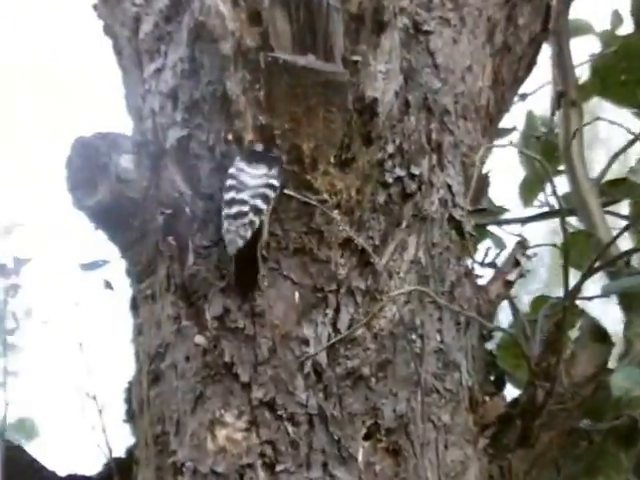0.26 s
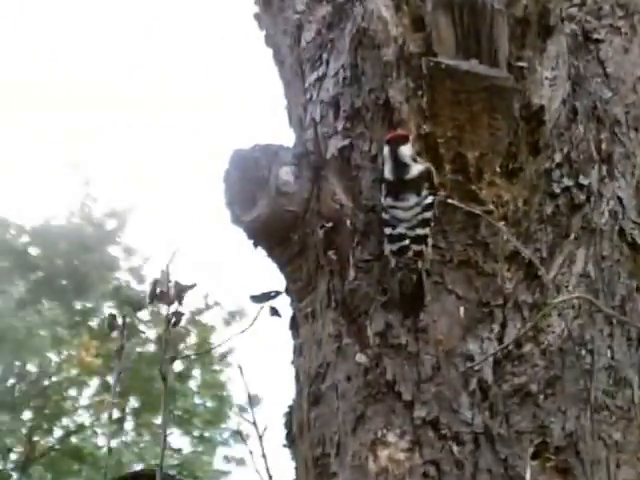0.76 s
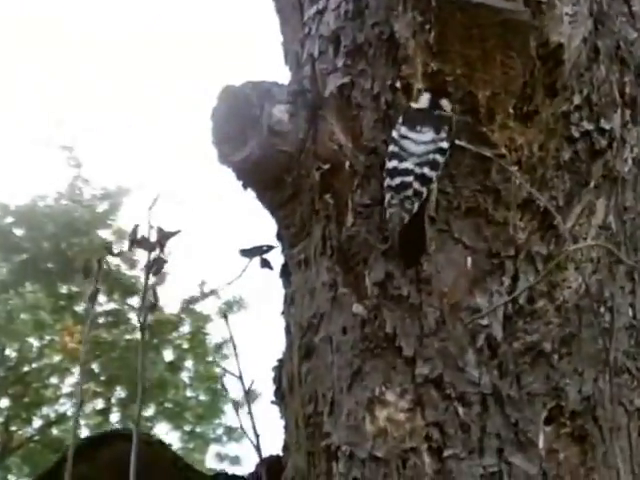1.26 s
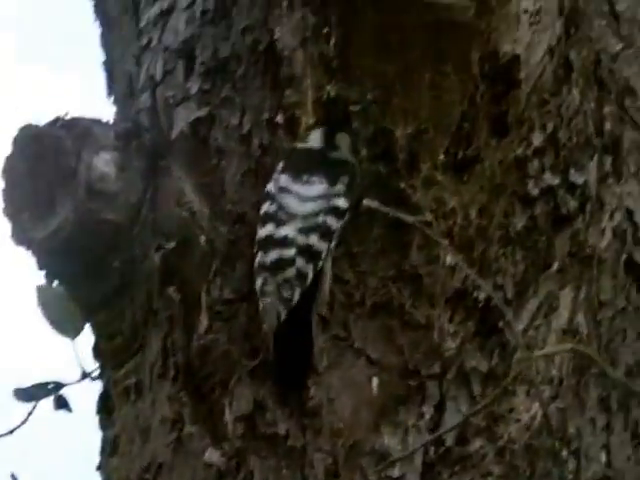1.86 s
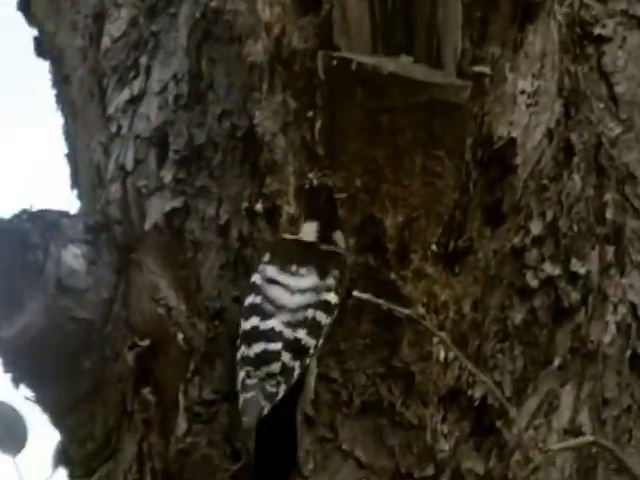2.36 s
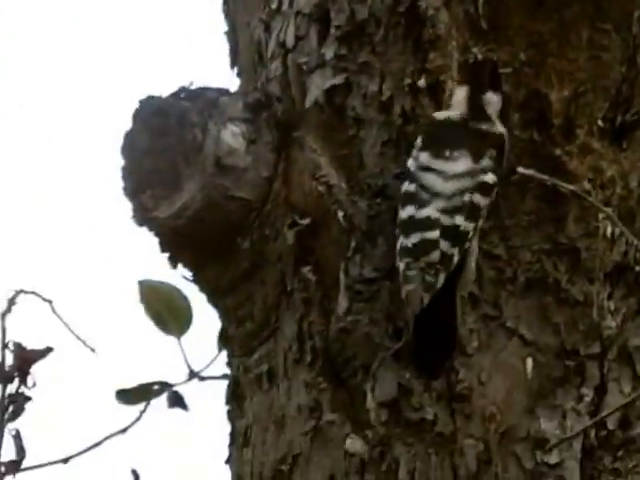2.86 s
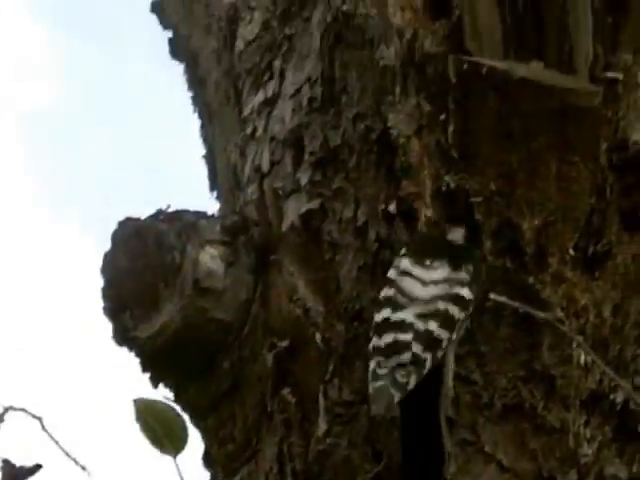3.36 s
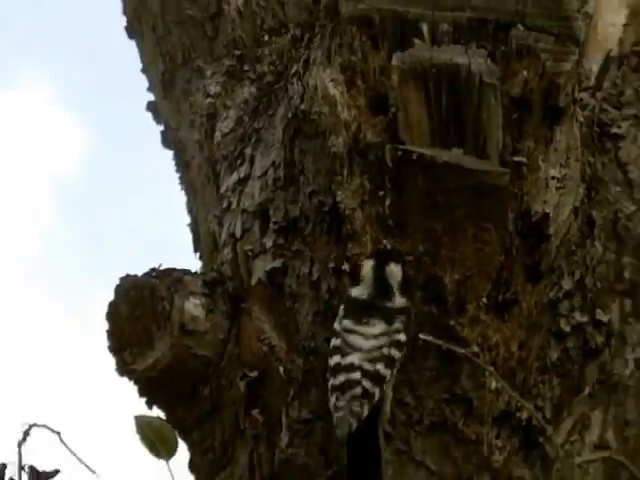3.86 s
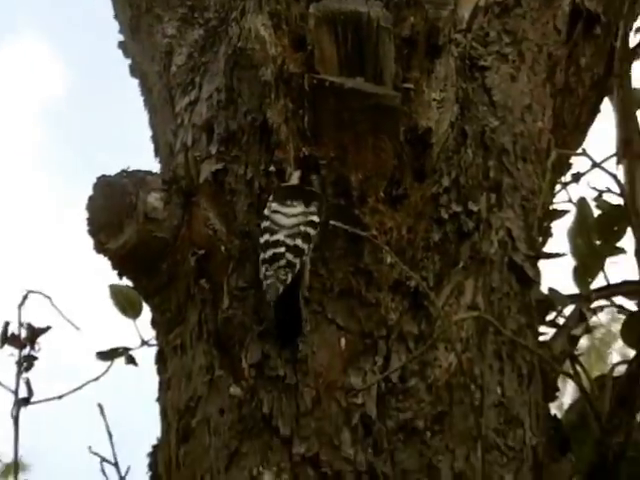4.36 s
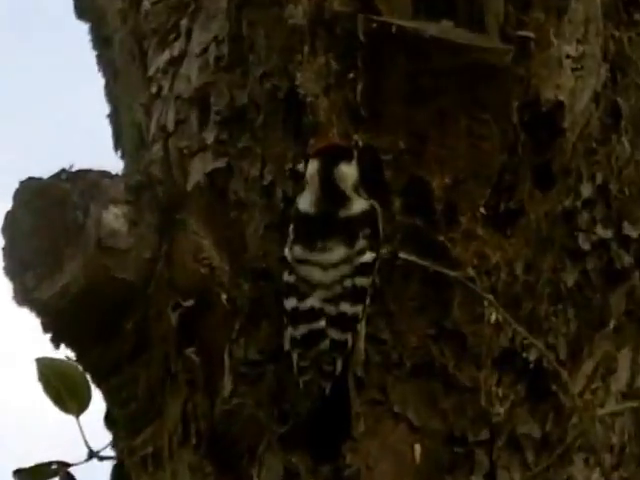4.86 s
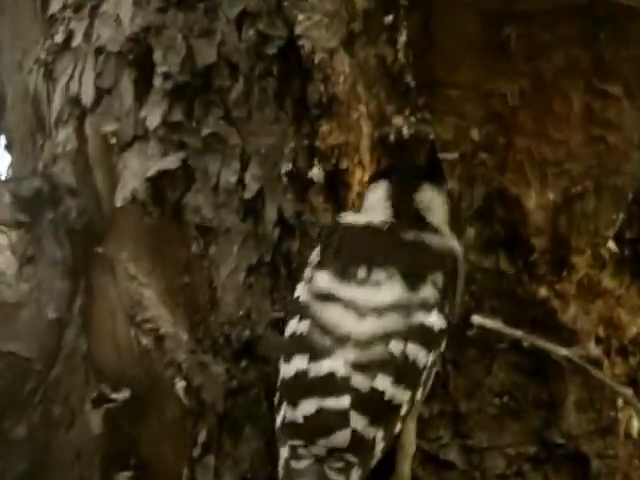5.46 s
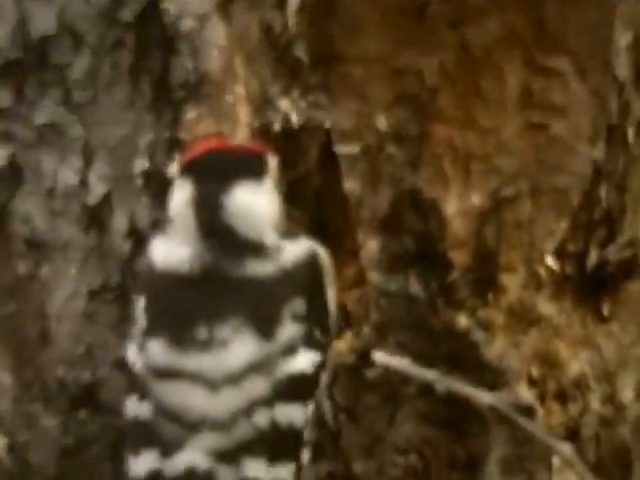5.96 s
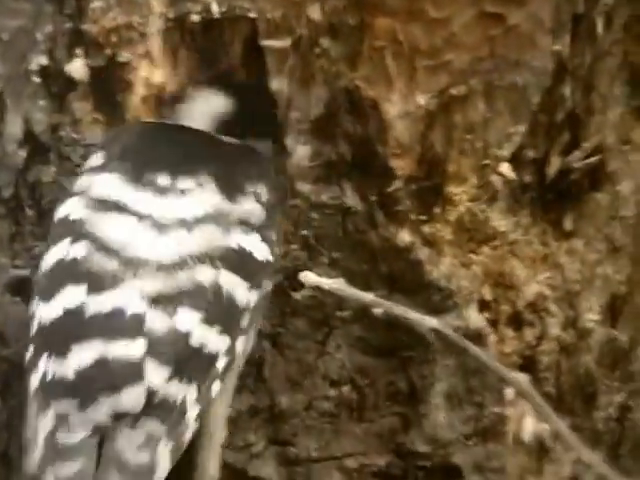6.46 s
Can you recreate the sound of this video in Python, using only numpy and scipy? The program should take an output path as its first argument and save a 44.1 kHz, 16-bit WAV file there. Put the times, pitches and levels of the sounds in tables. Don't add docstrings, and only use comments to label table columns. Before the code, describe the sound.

Quiet low rumble and leaf hiss open, with a tiny bump on the camera. Then a loud, quick woodpecker roll rattles on resonant wood a few metres away and stops sharply. Distant slow knocking and faint high bird whistles fill the pause over road noise. A second roll of dry hollow taps follows, then quiet ambience and one last far knock. Lo-fi pocket microphone, nearly centred, with digital crackle on the left side.

```python
import sys
import numpy as np
from scipy import signal
from scipy.fft import rfft, irfft
from scipy.io import wavfile
from scipy.ndimage import uniform_filter1d

SR = 44100
rng = np.random.default_rng(int(sys.argv[2]) if len(sys.argv) > 2 else 0)


def voltage_ratio(decibels):
    exponent = np.asarray(decibels, float) / 20
    return 10 ** exponent


def generate_wav(signal):
    frames = np.transpose(np.atleast_2d(signal))
    scaled = np.clip(frames, -1, 1) * 32767
    pcm = np.round(scaled).astype(np.int16)
    wavfile.write(sys.argv[1], SR, pcm)


N = 296173

# pitch_hz, level_db, rise_s, t60_s
ECHO_MODES = [(957, 0.5, .001, .033), (803, -0.5, .001, 0.033), (595, -8.5, 0.0017, .03),
              (1170, -7, .0006, 0.033), (1540, -5.5, .0005, 0.019), (1980, -12, .0004, .025),
              (2550, -15, 0.00031, 0.02)]


def coloured(points, count):
    hz, db = np.transpose(points)
    bins = np.fft.rfftfreq(count, 1 / SR)
    gain = voltage_ratio(np.interp(np.log(bins + 1), np.log(hz), db))
    x = irfft(rfft(rng.standard_normal(count)) * gain, count)
    return x / np.std(x)


def walk(rate_hz):
    k = int(SR / rate_hz)
    held = np.repeat(rng.standard_normal(N // k + 1), k)
    return 1.4 * uniform_filter1d(uniform_filter1d(held, k), k)[:N]


def band(x, lo_hz, hi_hz):
    return signal.sosfilt(signal.butter(2, [lo_hz, hi_hz], "band", fs=SR, output="sos"), x)


def add(out, start_s, x):
    i = int(start_s * SR)
    out[i:i + len(x)] += x[:len(out) - i]


def ring(modes, t, detune, scatter_db, slip):
    out = 0
    for pitch_hz, level_db, rise_s, t60_s in modes:
        a, b, c = rng.standard_normal(3)
        shape = (1 - np.exp(-t / rise_s)) ** 2 * np.exp(-np.log(1000) * t / t60_s)
        level = voltage_ratio(level_db + scatter_db * a) / shape.max()
        out = out - level * shape * np.sin(2 * np.pi * pitch_hz * (1 + detune * b) * t + slip * c)
    return out


def puff(lo_hz, hi_hz, t, length_s):
    x = band(rng.standard_normal(len(t)), lo_hz, hi_hz) * np.sin(np.pi * np.minimum(t / length_s, 1))
    return x / np.std(x)


def air():
    # time_s, level_db
    traffic_course = [
        (0, -84),
        (0.598, -74),
        (1.301, -65.5),
        (2.1, -64.5),
        (4, -65.5),
        (4.75, -63),
        (5.051, -66.5),
        (6.72, -63.5),
    ]
    # frequency_hz, density_db (per Hz)
    traffic_spectrum = [(100, -25), (200, -6.5), (350, 2), (500, 1), (800, -2.5), (1120, -7.5),
                        (1300, -14.5), (2000, -19.5), (3000, -35), (5000, -54)]
    leaves_spectrum = [(1000, -0.5), (1500, -6), (2500, -1.5), (4000, -3), (5500, -6.5), (7000, -12.5),
                       (7600, -24), (9000, -47)]
    rumble_spectrum = [(10, -9), (25, -5), (50, -0.5), (100, -4.5), (160, -7.5), (250, -14.5), (450, -15.5),
                       (900, -32.5), (2000, -39.5)]
    traffic_db = np.interp(np.arange(N) / SR, *np.transpose(traffic_course))
    traffic = voltage_ratio(traffic_db + 1.1 * walk(11)) * coloured(traffic_spectrum, N)
    gust_db = 0.7 * walk(3.2)
    leaves_db = -78 + 0.36 * (traffic_db - np.median(traffic_db)) + gust_db
    leaves = voltage_ratio(leaves_db + 0.96 * walk(60)) * coloured(leaves_spectrum, N)
    rumble = voltage_ratio(-66.5 + 0.99 * walk(6.2)) * coloured(rumble_spectrum, N)
    return rumble + traffic + leaves


def nudge():
    centre_s, width_s, height = .277, .003, .0024
    return height * np.exp(-((np.arange(N) / SR - centre_s) / width_s) ** 2)


def strike(t, upper_db, crack_db):
    # pitch_hz, level_db, rise_s, t60_s
    low_modes = [(1029.2, -1.5, .0018, 0.032), (846, -12, 0.0013, 0.06), (1095.5, -7.5, 0.0024, 0.034),
                 (599, -20, 0.0018, 0.024), (424, -22, 0.0058, 0.01)]
    upper_modes = [(1682.4, 4.5, 0.00078, 0.019), (1324, -6.5, 0.0017, 0.017)]
    crack_modes = [(2080, 4, 0.00048, 0.031), (2430, 2, 0.00045, 0.025), (2600, -1.5, 0.00035, 0.019),
                   (3844, -11.5, 0.0011, 0.03), (3384, -16, 0.0018, 0.044)]
    blow = ring(low_modes, t, .008, .9, .4) + voltage_ratio(upper_db) * ring(upper_modes, t, .012, .9, .4)
    blow += voltage_ratio(crack_db - 3) * ring(crack_modes, t, .04, 1.6, 1.3)
    splinter = band(band(rng.standard_normal(len(t)), 1800, 4200), 1200, 5500)
    splinter *= np.minimum(t / 0.0023, 1) * np.exp(-t / .008)
    thump_db = -38.5 + 5 * rng.standard_normal()
    thump = voltage_ratio(thump_db) * puff(120, 500, t, .013)
    return blow + voltage_ratio(crack_db + 1) * splinter + thump


def lead_in(t):
    lead_in_db = -33 + 3.5 * rng.standard_normal()
    return voltage_ratio(lead_in_db) * ring(ECHO_MODES, t, 0.039, 4.2, 2.7)


def drumming():
    # start_s (ring peak), level_db, upper_db (re lower modes), crack_db (re lower modes)
    first_roll = [(0.937, -22.5, -7.5, -16), (1.001, -20, -8.5, -22.5), (1.056, -18.5, -6.5, -18.5),
                  (1.111, -18, -6, -19), (1.165, -17.5, -6.5, -16.5), (1.218, -15, -4, -17),
                  (1.273, -16, -4, -11.5), (1.328, -17, -2, -16), (1.383, -16, -4, -16.5),
                  (1.438, -15.5, -5.5, -18), (1.495, -17.5, -6.5, -16.5), (1.551, -17, -6, -14),
                  (1.607, -15, -5.5, -19), (1.664, -15.5, -3, -15.5), (1.72, -17.5, -4.5, -21.5),
                  (1.777, -17, -5, -17.5), (1.836, -16, -5.5, -18), (1.893, -17, -5, -16),
                  (1.953, -18, -5, -18.5)]
    second_roll = [(5.216, -21.5, -12.5, -25), (5.281, -21, -8.5, -18), (5.335, -20, -7.5, -14.5),
                   (5.39, -18.5, -8, -14), (5.443, -16, -5.5, -11.5), (5.498, -17, -4.5, -12.5),
                   (5.552, -17, -6.5, -12), (5.605, -18.5, -10.5, -15), (5.658, -16.5, -5, -14),
                   (5.714, -15, -7, -13), (5.768, -20, -10, -16), (5.825, -20, -12.5, -20.5),
                   (5.88, -18.5, -8.5, -15.5), (5.933, -17, -12, -17), (5.992, -23.5, -13, -14),
                   (6.047, -18, -6, -14.5), (6.102, -17, -8.5, -18), (6.158, -16.5, -10, -14),
                   (6.215, -19.5, -7.5, -16), (6.273, -18.5, -7, -19), (6.33, -20.5, -8.5, -11)]
    # delay_s, level_db
    echoes = [(0.0191, -20), (.037, -36.5)]
    # pitch_hz, level_db (re blow), rise_s, t60_s
    hollow_modes = [(929, -30, 0.011, .14), (1040, -35, 0.0081, 0.13), (2582, -46, .01, 0.089)]
    # frequency_hz, density_db (per Hz)
    wood_spectrum = [(250, -32.5), (550, -8), (780, -7), (930, 0), (1400, -11.5), (2600, -18.5),
                     (4000, -28), (7500, -54)]
    out, t, late = np.zeros(N), np.arange(1300) / SR, np.arange(SR // 3) / SR
    choke = 1 / (1 + np.exp((t - .0115) / 0.00067))
    decay = np.exp(-late / 0.014) + voltage_ratio(-12) * np.exp(-late / 0.071)
    fade = np.minimum(late / 0.004, 1) * decay
    for start_s, level_db, upper_db, crack_db in first_roll + second_roll:
        contact_s = start_s - .0015
        add(out, contact_s, voltage_ratio(level_db) * choke * strike(t, upper_db, crack_db))
        add(out, contact_s - .0012, voltage_ratio(level_db - 39.0) * puff(14, 83, t, 0.022))
        add(out, contact_s - .0032, voltage_ratio(level_db) * choke * lead_in(t))
        for delay_s, echo_db in echoes:
            add(out, contact_s + delay_s, voltage_ratio(level_db + echo_db) * ring(ECHO_MODES, t, .015, 2, .9))
        add(out, contact_s + .011, voltage_ratio(level_db) * ring(hollow_modes, late[:6000], .006, 1.5, 1.5))
        add(out, contact_s, voltage_ratio(level_db - 24) * fade * coloured(wood_spectrum, len(late)))
    return out


def songbirds():
    # start_s, length_s, level_db
    high_notes = [
        (2.84, 0.22, -84),
        (3.17, 0.16, -73.5),
        (3.48, 0.126, -71.5),
        (3.69, .07, -86),
        (4.07, .2, -81),
        (4.52, 0.19, -82),
        (4.93, .14, -86),
    ]
    mid_notes = [
        (2.61, 0.115, -75),
        (2.74, 0.049, -76),
        (2.86, 0.1, -79),
        (3.05, 0.081, -82.5),
        (3.4, 0.073, -90),
    ]
    low_notes = [
        (2.49, 0.12, -75.5),
        (3.6, .1, -79.5),
        (4.44, .09, -82),
        (4.55, 0.065, -71),
        (5.06, .15, -78.5),
    ]
    # start_s, length_s, pitch_hz, level_db
    warble = [
        (2.39, .07, 4110, -81),
        (2.428, 0.083, 3050, -82),
        (2.598, 0.09, 3340, -71.5),
        (2.787, 0.04, 3140, -73),
        (4.763, 0.12, 4374, -79),
        (6.383, .3, 5290, -85.5),
    ]
    # notes, starting pitch in Hz, glide in Hz/s
    singers = ((high_notes, 4810, -100), (mid_notes, 3700, 390), (low_notes, 2860, -600))
    notes = []
    for rows, pitch_hz, glide in singers:
        notes += [(s, length, pitch_hz, pitch_hz + glide * length, db) for s, length, db in rows]
    notes += [(s, length, pitch_hz, pitch_hz, db) for s, length, pitch_hz, db in warble]
    for a, b, c, d in rng.random((300, 4)):
        pitch_hz = 2000 + 2900 * c
        notes.append((1 + 5.6 * a, .02 + .05 * b, pitch_hz + 200, pitch_hz + 400 * d, -91))
    out = np.zeros(N)
    for start_s, length_s, from_hz, to_hz, level_db in notes:
        u = np.linspace(0, 1, int(length_s * SR))
        waver = uniform_filter1d(rng.standard_normal((2, SR // 3)), 450)[:, :len(u)] * 21
        phase = 2 * np.pi * np.cumsum(from_hz + (to_hz - from_hz) * u) / SR
        whistle = (1 + .75 * waver[0]) * np.sin(phase + 1.1 * waver[1])
        add(out, start_s, voltage_ratio(level_db + 4) * np.sqrt(np.sin(np.pi * u).clip(0)) * whistle)
    t = np.arange(SR // 6) / SR
    tail = voltage_ratio(-37.5) * rng.standard_normal(len(t)) * np.exp(-t / 0.02)
    return out + signal.fftconvolve(out, tail)[:N]


def hammer():
    # start_s, level_db (peak), over_db (overtone re peak)
    knocks = [
        (2.346, -53, -20),
        (2.574, -46.5, -9),
        (2.821, -45, -13),
        (3.073, -44, -7),
        (3.317, -48.5, -8),
        (3.584, -46.5, -6.5),
        (4.563, -50, -8),
        (4.802, -52.5, -4.5),
        (6.635, -54, -15.5),
    ]
    out, t = np.zeros(N), np.arange(3000) / SR
    for start_s, level_db, over_db in knocks:
        # pitch_hz, level_db, rise_s, t60_s
        modes = [(537.0, -5.5, 0.0086, 0.033), (436, -3, 0.0023, 0.017), (634, -7.0, 0.0038, 0.015),
                 (1065, over_db - 3, 0.0016, 0.036), (787, over_db - 5, .002, 0.037)]
        blow = ring(modes, t, 0.036, 0.46, 2.3)
        tail = band(rng.standard_normal(len(t)), 350, 1200) * np.minimum(t / 0.011, 1) * np.exp(-t / 0.0089)
        add(out, start_s, voltage_ratio(level_db) * (blow + voltage_ratio(4.5) * tail))
    return out


def scene():
    return np.tile(air() + nudge() + drumming() + songbirds() + hammer(), (2, 1))


def roll_off(x):
    return signal.sosfilt(signal.butter(12, 15500, fs=SR, output="sos"), x)


def record(dry):
    sampling_hz, step, offset = 16000, 1 / 260, .00196
    right = signal.resample_poly(dry[1], 160, 441) + offset
    coarse = np.floor(right / step) * step
    fine = right - coarse
    left = fine + np.r_[coarse[0], coarse[:-1]]
    taps = signal.firwin(441 * 32 + 1, 8000, window=("kaiser", 9), fs=sampling_hz * 441)
    both = signal.resample_poly([left, right], 441, 160, axis=1, window=taps)
    hiss = voltage_ratio(-95) * rng.standard_normal((2, N))
    return roll_off(both[:, :N] + hiss)


dry = scene()
out = record(dry)
generate_wav(out)
```